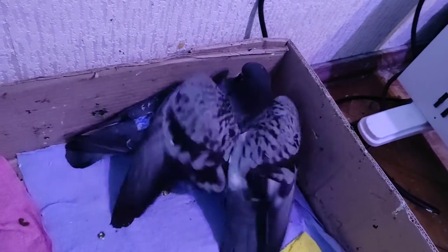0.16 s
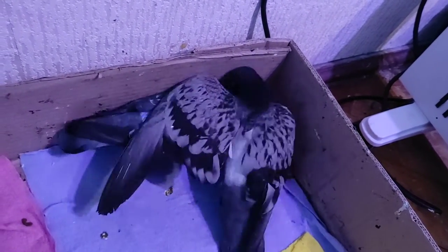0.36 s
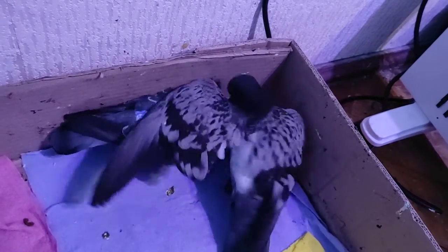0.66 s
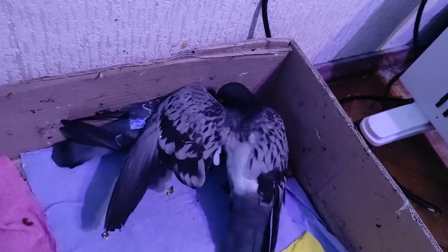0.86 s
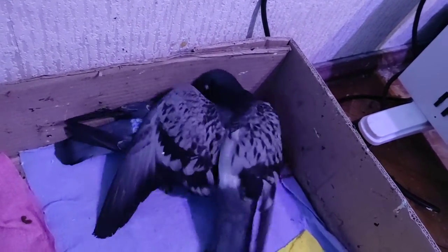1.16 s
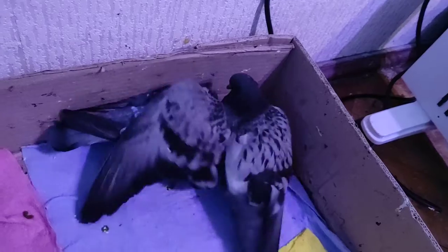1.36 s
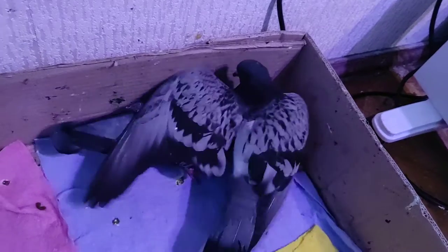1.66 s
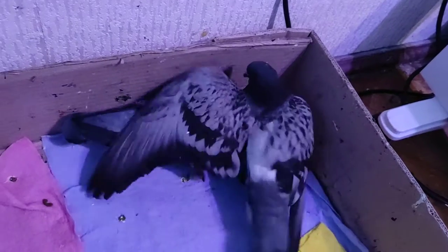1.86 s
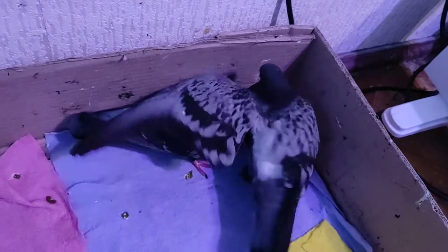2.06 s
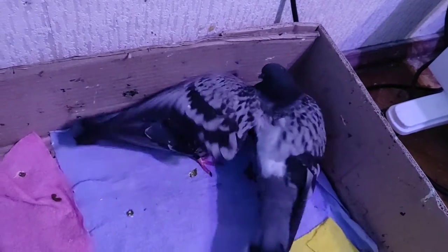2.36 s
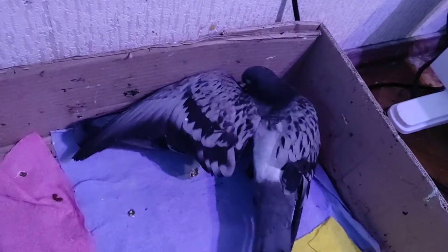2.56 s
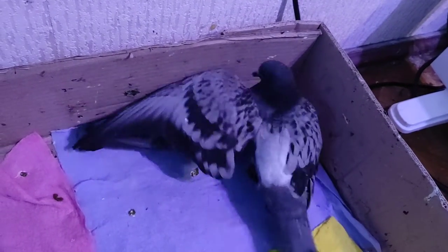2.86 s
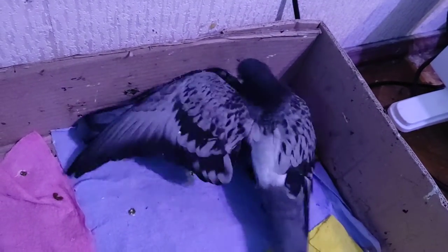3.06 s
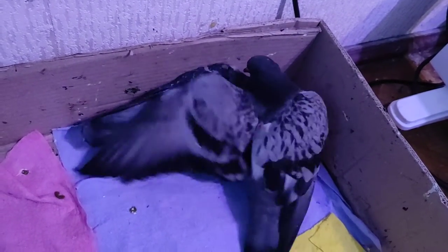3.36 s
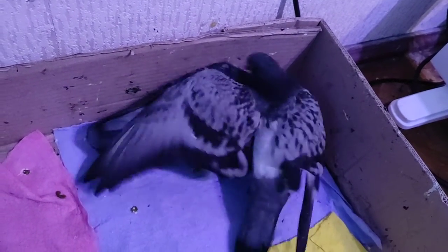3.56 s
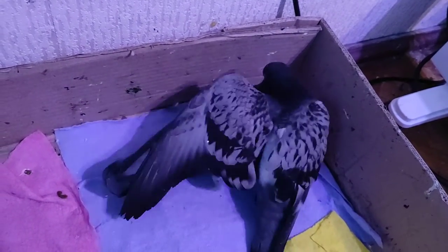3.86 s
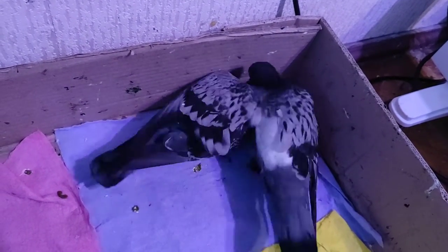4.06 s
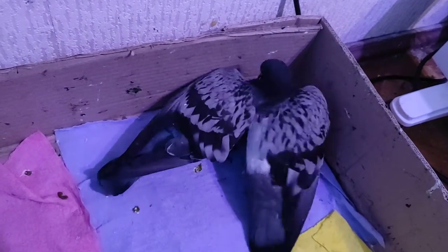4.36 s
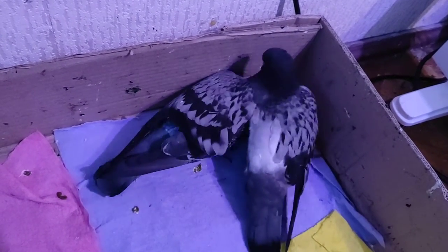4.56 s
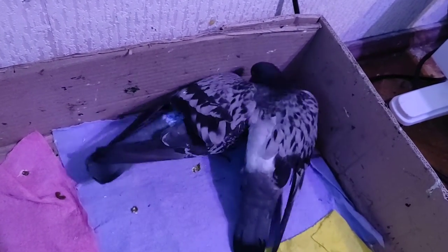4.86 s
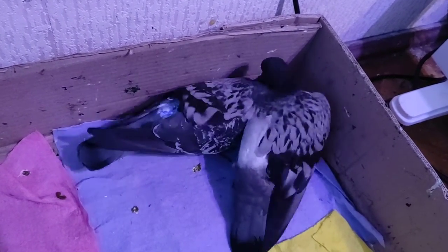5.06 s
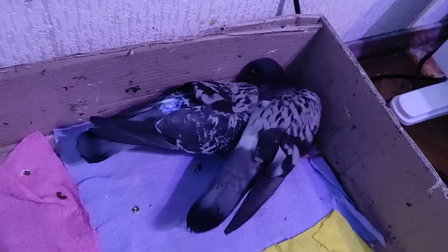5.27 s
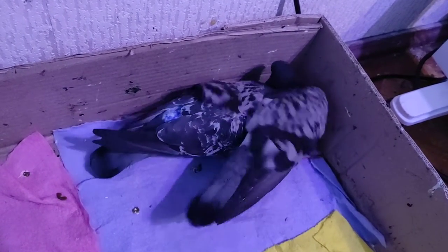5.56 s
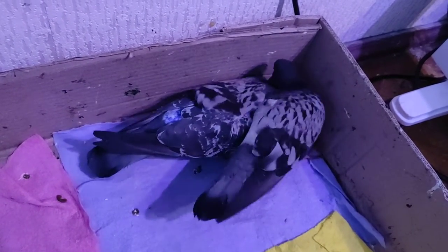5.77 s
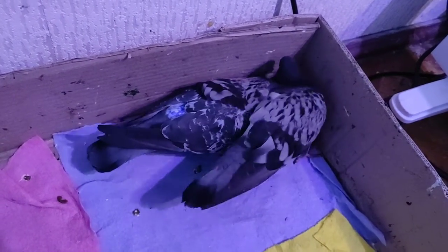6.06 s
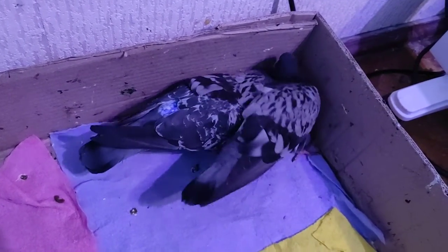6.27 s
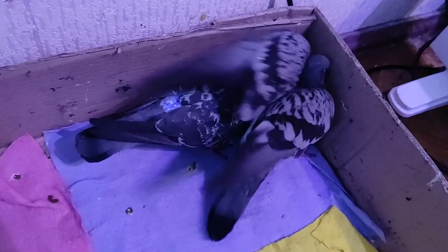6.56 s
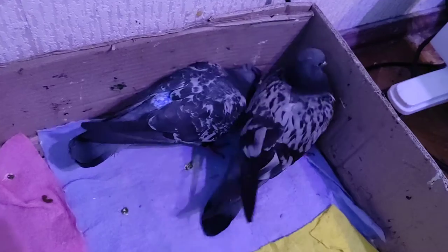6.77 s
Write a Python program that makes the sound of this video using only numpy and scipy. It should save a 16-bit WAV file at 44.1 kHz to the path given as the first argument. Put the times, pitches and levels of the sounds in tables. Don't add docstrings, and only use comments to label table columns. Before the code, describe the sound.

Two pigeons scuffle in a cardboard box, feathers rustling, wings slapping and knocking the walls, with faint low grunts and handling bumps.

```python
import sys
import numpy as np
from scipy import signal
from scipy.fft import rfft, irfft
from scipy.io import wavfile

SR = 44100
rng = np.random.default_rng(int(sys.argv[2]) if len(sys.argv) > 2 else 0)


def gain_from_decibels(decibels):
    exponent = np.asarray(decibels, float) / 20
    return 10 ** exponent


def inscribe(sig):
    pcm = np.round(np.clip(np.atleast_2d(sig).T, -1, 1) * 32767)
    wavfile.write(sys.argv[1], SR, pcm.astype(np.int16))


N = 304731

# (frequency [Hz], density [dB])
AIR_SPECTRUM = [(20, 13.5), (60, -5), (125, -21.5), (170, -7.5), (300, -19), (600, -19), (1500, -31),
                (4000, -29.5), (9000, -37.5), (16000, -37)]
AIR_DB, ROOM_T60_S, ROOM_DB = -59, 0.42, -14

PORT_HZ, PORT_Q, LEFT_LAG_S = 7400, 9, 0.0001
# (time [s], treble [dB])
FINGER_COVER = [
    (0, 5),
    (3.9, -2),
    (5.2, -11),
    (6.91, -19),
]
# (time [s], level [dB])
GRIP = [(0, -54), (.8, -49.5), (1.0, -56), (1.5, -49), (2.0, -51), (2.2, -42), (2.4, -57.5), (2.6, -44),
        (2.8, -51), (3.0, -49), (3.8, -52), (4.2, -43.5), (5.0, -50), (5.5, -50), (5.9, -34.5),
        (6.2, -42.5), (6.4, -36.5), (6.9, -33)]
# (time [s], peak [dB], snap re peak [dB], deep shove re peak [dB])
BUMPS = [(1.288, -45, -7, 11.5), (2.085, -39, -15, -14), (2.158, -23.5, 1, 11.5), (2.585, -20.5, -9.5, -18),
         (2.691, -34.5, -8, 6.5), (3.577, -29, -3, 13), (3.613, -29, -29, -12), (4.167, -35, -44, 11.5),
         (4.301, -34.5, -7, 5.5), (4.627, -34, -25, 20.5), (4.684, -36, -15, -5), (5.304, -35, -31, 11.5),
         (5.608, -52, -4, 30), (5.673, -39, -19, -9), (5.789, -14, -3, 7.5), (5.842, -15.5, -3.5, 11),
         (5.877, -14, -6, 0), (5.92, -32, -7, 23.5), (5.956, -17, -10, 4), (6.05, -37, -17, 21),
         (6.091, -36.5, -28, 11), (6.159, -40, -12, -9), (6.53, -31, -29, 16.5), (6.599, -43, -26, 1),
         (6.66, -38, -15, -7), (6.701, -33, -28, -13), (6.733, -42, -6, 2), (6.78, -25.5, -13, -4),
         (6.833, -23.5, -39, -10), (6.902, -19, 0, 23)]
# (time [s], casing ring [Hz], ring decay [s], nail tick [dB])
RAPS = [
    (5.789, 71, 0.022, -27),
    (5.842, 123.6, 0.019, -21),
    (5.876, 130, 0.012, -24.5),
    (5.956, 138.5, 0.017, -21),
    (6.902, 121, 0.013, -31),
]
# (middle [s], peak [dB], pitch [Hz], half-length [s])
CLACKS = [(5.792, -9, 293, .0032), (5.7905, -20, 520, .0015), (5.8015, -14.5, 144, .005),
          (5.845, -24, 400, 0.0021), (5.878, -29, 570, .0022), (5.9595, -20, 120, .003),
          (5.97, -21, 29, 0.013), (5.855, -26, 30, .01), (5.607, -31, 85, .012), (5.75, -37, 100, 0.017),
          (6.903, -20, 357, .003)]
SHUFFLE_DB, SHUFFLE_FOLLOWS = -50.5, 0.41

# (start [s], length [s], pulse rate [Hz], hum [dB], throat ring re hum [dB])
GRUNTS = [(1.505, .13, 110.6, -59, -6), (1.63, 0.12, 108, -59, -6), (2.041, 0.14, 104.1, -60, -6.5),
          (2.194, 0.11, 106.8, -60.5, -5), (2.654, 0.12, 100.8, -65, -4.5), (2.778, 0.17, 101.1, -66, -4),
          (3.621, 0.09, 101.2, -59, -8), (3.707, 0.081, 105, -55.5, -12), (5.729, 0.072, 107.6, -62, -1.5),
          (5.981, .07, 103.2, -61, -6.5), (6.36, 0.13, 92.6, -64.5, 0.5), (6.486, 0.083, 105.2, -58, -10.5),
          (6.597, 0.077, 97.8, -61, -5), (6.692, .11, 78.2, -61, -7)]
PITCH_SAGS = [94, 42, 77, 83, 83.5, 90, 83, 89, 90, 83, -60, 60, 85, -51]
# (frequency [Hz], width [Hz], level [dB])
THROAT = [(261, 79, 10), (531, 17, -5)]
# (multiple of the pulse rate [1], level [dB])
OVERTONES = [(3, -1), (4, -6), (5, -20)]
SWELL_DB_PER_S, GRUNT_RELEASE_S, LAST_DROP_HZ, LAST_DROP_S = 25, 0.016, 5.4, 0.025

# (middle [s], peak [dB], pitch [Hz], half-length [s])
THUDS = [(.1215, -23.5, 555, 0.0027), (.127, -34, 690, 0.0028), (.1365, -24.5, 173, 0.007),
         (.327, -38, 573, 0.0029), (1.1375, -22, 1040, 0.0018), (1.141, -18.5, 723, 0.0027),
         (1.155, -37, 755, 0.0034), (1.316, -45, 705, 0.0035), (1.477, -43, 736, 0.0029),
         (1.715, -46, 195, .018), (.33, -38, 280, .008), (.175, -38, 220, .01), (1.163, -36, 290, .008),
         (2.152, -41, 706, .004), (2.458, -35.5, 690, 0.0018), (2.4645, -33, 716, 0.0017),
         (2.465, -41, 229, 0.0088), (2.923, -38.5, 550, 0.0045), (3.29, -37, 550, 0.0034),
         (4.838, -37.5, 254, 0.0048), (5.985, -39, 1060, 0.0029), (5.985, -46, 1680, .003),
         (6.181, -33.5, 1580, 0.0023), (6.19, -39, 227, 0.0048)]
# (start [s], length [s], level [dB], low edge [Hz], high edge [Hz])
SCRAPES = [(.128, 0.0075, -39.5, 1200, 2700), (0.69, 0.03, -54, 2200, 5200), (.803, 0.036, -48, 2540, 3500),
           (1.551, .004, -43, 2100, 2700), (1.551, .004, -50, 5500, 9000), (3.469, .003, -50, 1000, 9000),
           (3.75, .003, -52, 3000, 9000), (4.315, .004, -58, 3000, 9000), (1.4, .015, -51.5, 860, 1200),
           (1.775, .015, -47, 1700, 1850), (3.96, 0.038, -60, 130, 310), (0.455, 0.065, -64.5, 242, 340),
           (.79, 0.056, -59.5, 230, 340)]
# (time [s], crack peak [dB], panel [dB], wall [dB], edge [dB])
KNOCKS = [(0.119, -9, -27.5, -32, -37), (0.3246, -21.5, -34.5, -37, -49), (0.676, -37, -58, -55.5, -37.5),
          (1.136, -5, -29.5, -24, -21.5), (1.2887, -28, -69, -78, -37), (1.3078, -28, -39.5, -47, -67),
          (1.405, -53, -52, -60, -47), (1.4719, -40, -40, -42.5, -64), (1.5517, -27, -50, -48, -52),
          (1.7747, -29.5, -40, -72, -35), (1.9978, -26, -52, -50.5, -72), (2.1459, -22, -65, -39.5, -56),
          (2.3112, -19, -47.5, -51, -63), (2.4535, -15, -39, -38.5, -61),
          (2.9182, -12, -35.5, -35.5, -30.5), (3.282, -48, -45, -43.5, -37), (3.472, -36, -53, -50.5, -44),
          (3.673, -38, -45, -53, -66), (3.7143, -52, -42, -51.5, -42.5), (3.752, -31, -61, -67, -47),
          (4.832, -35.5, -39.5, -64, -60), (5.9807, -22, -50, -49, -53), (6.1775, -26, -36.5, -48, -37.5),
          (6.4481, -22, -61, -64, -44)]
# (frequency [Hz], level [dB], t60 [s])
PANEL_MODES = [(105, 1, 0.045), (144.8, -7.5, 0.24), (202, -3, 0.091), (214, -2, 0.069), (268, 2, 0.056),
               (307, 4.5, 0.037), (423, -9, 0.025), (460, -5, 0.025)]
# (frequency [Hz], level [dB], t60 [s])
WALL_MODES = [(552, 6.5, 0.031), (616, 1, 0.042), (706, 1, 0.046), (794, 2.5, 0.042), (850, -6, 0.019),
              (1008, -8, 0.12), (1030, -13.5, 0.086), (1120, -9.5, 0.052)]
# (frequency [Hz], level [dB], t60 [s])
EDGE_MODES = [(1410, 0, .014), (1600, 0, .014), (1850, -2, .012), (2150, -3, .01), (2600, -3, .01),
              (3200, -3, .008)]
PANEL_LATE_S, CRACK_T60_S = 0.00381, 0.043

# (time [s], hiss [dB])
FIDGET = [(0, -48), (.3, -52.5), (.9, -58), (1.4, -49), (1.8, -51), (1.85, -92), (1.92, -56.5), (1.98, -50),
          (2.4, -49), (2.8, -55.5), (3.0, -60), (3.3, -74), (3.6, -52), (4.3, -64), (5.7, -58),
          (6.3, -67.5), (6.6, -56), (6.9, -75)]
# (peak [s], hiss [dB], fall [s], rub re hiss [dB])
SLAPS = [(0.124, -39, 0.022, 8.5), (0.326, -40, 0.022, 2), (0.686, -45.5, 0.096, -10.5),
         (1.314, -39, 0.029, -7.5), (1.47, -37, 0.023, -7.5), (1.786, -38.5, 0.04, -12),
         (2.006, -33, .016, -22), (2.155, -32, 0.031, -13), (2.313, -41, 0.083, -9),
         (2.461, -33, 0.022, -16), (3.286, -36.5, 0.047, -12), (3.473, -38, 0.039, -17),
         (3.678, -45.5, 0.014, -7), (4.834, -52, 0.034, -7.5), (5.797, -45.5, 0.038, -6.5),
         (5.885, -55.5, 0.035, -6), (5.945, -47, 0.028, -9), (5.984, -49.5, 0.024, 7),
         (6.18, -52, 0.013, 9.5), (6.456, -46, 0.0066, 0)]
# (peak [s], hiss [dB], fall [s])
FLICKS = [(0.253, -49, 0.015), (0.434, -47, .005), (0.964, -45, 0.027), (1.213, -38.5, 0.018),
          (1.382, -44.5, 0.25), (1.62, -43.5, .025), (1.712, -44.5, 0.05), (2.09, -47, 0.047),
          (2.255, -56, .029), (2.518, -44, 0.028), (2.841, -48, .011), (3.653, -49, 0.023),
          (4.186, -51, .009), (4.318, -47, 0.26), (4.5, -44.5, 0.05), (4.905, -47, 0.028),
          (5.115, -46.5, 0.014), (5.681, -48.5, 0.0065), (5.747, -61, .011), (6.087, -45, 0.022)]
# (peak [s], hiss [dB], rise [s], fall [s])
SWEEPS = [(0.295, -48.5, 0.023, .009), (0.509, -49, 0.041, 0.028), (0.609, -39.5, 0.038, 0.085),
          (0.812, -39, 0.015, 0.035), (0.838, -39.5, 0.03, 0.03), (0.875, -44.5, 0.027, 0.034),
          (1.14, -43, 0.095, 0.063), (1.54, -46, 0.03, 0.01), (2.585, -49, 0.033, 0.0097),
          (2.641, -45, 0.079, 0.011), (2.921, -44, 0.07, 0.13), (3.096, -43.5, 0.079, 0.05),
          (3.234, -49, 0.076, 0.053), (3.372, -48.5, 0.078, 0.1), (3.758, -47, 0.054, 0.046),
          (3.845, -44, 0.03, 0.034), (3.983, -45, 0.055, 0.013), (4.074, -52, 0.028, 0.067),
          (4.156, -48.5, 0.026, 0.04), (4.44, -49, .087, 0.02), (4.611, -46.5, 0.025, .048),
          (4.715, -53.5, 0.038, 0.12), (4.982, -45, 0.045, 0.12), (5.284, -51.5, 0.062, 0.046),
          (5.492, -46.5, 0.025, 0.021), (5.576, -51.5, 0.02, .068), (5.652, -46, 0.011, 0.025),
          (6.28, -57, .025, 0.021), (6.371, -53, 0.02, 0.053), (6.61, -32, 0.063, 0.035),
          (6.721, -48, 0.045, .023), (6.802, -52.5, 0.022, 0.046)]
# (low edge [Hz], high edge [Hz], level [dB])
BARB_BANDS = [(2430, 4370, -2), (4860, 7600, -1), (5840, 14100, -1.5), (8620, 9100, 0),
              (11560, 15300, -6.5), (13600, 17700, 14)]
# (frequency [Hz], density [dB])
RUB_SPECTRUM = [(300, -4), (700, -0.5), (1100, -2), (2000, -4.5), (3500, -11.5), (5000, -9.5)]
SLAP_RISE_S, FLICK_RISE_S = 0.01, 0.012
FLICK_RUB_DB, SWEEP_RUB_DB, FIDGET_RUB_DB = -13, -14.5, -8
BLOTCH_DB = 2.2


def rms_one(x):
    return x / np.sqrt(np.mean(x ** 2) + 1e-20)


def in_time(rows):
    s, *columns = np.transpose(rows)
    return [np.interp(np.arange(N) / SR, s, c) for c in columns]


def band(x, low_hz, high_hz, order=2):
    edges = [low_hz, min(high_hz, 0.45 * SR)]
    return signal.sosfilt(signal.butter(order, edges, "band", fs=SR, output="sos"), x)


def soften(x, hz, order=1):
    return signal.lfilter(*signal.butter(order, hz, fs=SR), x)


def drift(rate_hz):
    r = np.exp(-2 * np.pi * rate_hz / SR)
    slow = signal.lfilter([1], [1, -2 * r, r * r], rng.standard_normal(N + 9000))
    return rms_one(slow[9000:])


def coloured(points, channels):
    hz = np.maximum(np.fft.rfftfreq(N, 1 / SR), 1)
    point_hz, point_db = np.array(points).T
    gain = gain_from_decibels(np.interp(np.log(hz), np.log(point_hz), point_db, -60, -60))
    return rms_one(irfft(rfft(rng.standard_normal((channels, N))) * gain, N))


def ring(clicks, hz, t60):
    r, w = gain_from_decibels(-60 / (t60 * SR)), 2 * np.pi * hz / SR
    return signal.lfilter([0, np.sin(w)], [1, -2 * r * np.cos(w), r * r], clicks + 1e-18)


def bursts(rows):
    out, t = np.zeros(N), np.arange(N) / SR
    for s, level_db, hz, half in rows:
        n = slice(int((s - 0.05) * SR), int((s + 0.05) * SR))
        since = t[n] - s
        out[n] += gain_from_decibels(level_db) * np.cos(2 * np.pi * hz * since) * np.exp(-(since / half) ** 2)
    return out


def cavity(x, hz, q):
    w = 2 * SR * np.tan(np.pi * hz / SR)
    return signal.lfilter(*signal.bilinear([1], [1 / w ** 2, 1 / (w * q), 1], SR), x)


def room(x, first_s):
    t = np.arange(SR // 2) / SR
    white = rng.standard_normal((2, len(t))) * (t > first_s)
    low = soften(white, 1000, order=2)
    tail = low * gain_from_decibels(-60 * t / (0.62 * ROOM_T60_S))
    tail += gain_from_decibels(-6.0) * (white - low) * gain_from_decibels(-60 * t / (0.25 * ROOM_T60_S))
    return gain_from_decibels(-20.0) * signal.fftconvolve(x[None], tail, axes=1)[:, :N]


def grip_rumble():
    deep_db, = in_time(GRIP)
    fidget_db, = in_time(FIDGET)
    cover_db, = in_time(FINGER_COVER)
    shuffle_db = SHUFFLE_DB + SHUFFLE_FOLLOWS * (fidget_db + 55) + 0.1 * cover_db
    deep = rms_one(band(rng.standard_normal(N), 8.7, 53.2))
    shuffle = rms_one(band(rng.standard_normal(N), 147, 220, order=1))
    out = gain_from_decibels(deep_db + 3.17 * drift(12.0)) * deep
    return out + gain_from_decibels(shuffle_db - 10.5 + 2.4 * drift(42)) * shuffle


def finger_bumps():
    out, t = np.zeros(N), np.arange(3000) / SR
    for (s, level_db, snap_db, shove_db), luck in zip(BUMPS, rng.random((len(BUMPS), 3))):
        hz, decay, tick_db = 105 * (0.723 + 0.65 * luck[0]), 0.015, snap_db / 4 - 28.0
        hard = [rap[1:] for rap in RAPS if abs(rap[0] - s) < 0.01]
        if hard:
            hz, decay, tick_db = hard[0]
        falling = hz * t + 1.456 * (1 - np.exp(-t / 0.0064))
        body = np.sin(2 * np.pi * (falling + 0.32 + 0.13 * luck[1]))
        body *= np.exp(-t / decay) * (1 - np.exp(-(t / 0.0056) ** 2))
        snap = np.sin(2 * np.pi * (280 * t + 0.5 * (1 - np.exp(-t / 0.0088))))
        snap *= gain_from_decibels(snap_db - 0.5) * np.exp(-((t - 0.0045) / 0.0012) ** 2)
        shove = gain_from_decibels(shove_db - 7.0) * np.sin(2 * np.pi * 58 * t * (0.54 + 1.22 * luck[2]))
        shove *= np.sin(np.pi * t / t[-1]) * np.exp(-t / 0.018)
        tick = gain_from_decibels(tick_db) * np.sin(2 * np.pi * 950 * t) * np.exp(-((t - 0.002) / 0.0012) ** 2)
        at = int((s - 0.0015) * SR)
        out[at:at + len(t)] += (gain_from_decibels(level_db) * (body + snap + tick + shove))[:N - at]
    return out + bursts(CLACKS)


def grunts(wobble=0.0363, throb_db=4.5, jitter=0.086):
    out, pulses, t = np.zeros(N), np.zeros(N), np.arange(N) / SR
    unsteady, shake = drift(26.1), drift(61)
    throbs = gain_from_decibels(throb_db * np.array([drift(28) for _ in range(4)]))
    for (s, length, hz, hum_db, ring_db), sag in zip(GRUNTS, PITCH_SAGS):
        since = np.clip(t - s, 0, length)
        rate = hz - sag * since - LAST_DROP_HZ * np.exp((since - length) / LAST_DROP_S)
        gate = np.clip(np.minimum(since / 0.013, (length - since) / GRUNT_RELEASE_S), 0, 1)
        gate = gate * gain_from_decibels(hum_db + SWELL_DB_PER_S * since)
        cycles = np.cumsum(rate * (1 + wobble * unsteady)) / SR
        out += gate * gain_from_decibels(7.0) * throbs[0] * np.sin(4 * np.pi * cycles)
        for (multiple, db), throb in zip(OVERTONES, throbs[1:]):
            out += gate * gain_from_decibels(ring_db + db + 4.5) * throb * np.sin(2 * np.pi * multiple * cycles)
        fires = np.diff(np.floor(cycles + jitter * shake)) > 0
        pulses[1:] += (gate * gain_from_decibels(ring_db + throb_db * shake))[1:] * fires
    return out + sum(gain_from_decibels(db) * ring(pulses, hz, 2.26 / width) for hz, width, db in THROAT)


def scrapes():
    out, t, white = np.zeros(N), np.arange(N) / SR, rng.standard_normal(N)
    for s, length, level_db, low_hz, high_hz in SCRAPES:
        n = slice(int((s - 0.05) * SR), int((s + length + 0.05) * SR))
        attack = (t[n] - s) / 0.002
        release = (s + length - t[n]) / (0.44 * length) + 1
        gate = np.clip(np.minimum(attack, release), 0, 1)
        out[n] += gain_from_decibels(level_db) * gate * rms_one(band(white[n], low_hz, high_hz))
    return out


def thuds():
    return bursts(THUDS)


def knocks():
    table, out = np.array(KNOCKS), np.zeros(N)
    when = np.sort(rng.random((len(table), 5)) * [0, 1, 1, 1, 1])
    # (column of KNOCKS, modes, trim [dB], contact [s], delay [s])
    parts = [(2, PANEL_MODES, -6.0, 0.018, PANEL_LATE_S),
             (3, WALL_MODES, -5.0, 0.007, 0),
             (4, EDGE_MODES, -6.0, 0.005, 0)]
    for column, modes, trim_db, contact_s, late_s in parts:
        touch = ((table[:, :1] + late_s + contact_s * when) * SR).astype(int)
        for hz, level_db, t60 in modes:
            luck = rng.normal(0, 1, (len(table), 5))
            force = (0.25 * luck + 0.7 * np.sign(luck)) * [0.54, 0.72, 0.78, 0.38, 0.33]
            clicks = np.zeros(N)
            clicks[touch] = gain_from_decibels(table[:, column, None] + level_db + trim_db) * force
            out += ring(clicks, hz, t60)
    starts = np.zeros(N)
    starts[(table[:, 0] * SR).astype(int)] = gain_from_decibels(table[:, 1] - 17.0)
    crack = signal.lfilter([1], [1, -gain_from_decibels(-60 / (CRACK_T60_S * SR))], starts)
    return out + band(crack * rng.standard_normal(N), 2550, 14400, order=1)


def wing_strokes():
    strokes = [(s, db, SLAP_RISE_S * gain_from_decibels(-0.5 * max(rub + 6, 0)), fall, rub) for s, db, fall, rub in SLAPS]
    strokes += [(s, db, FLICK_RISE_S, fall, FLICK_RUB_DB) for s, db, fall in FLICKS]
    strokes += [(*row, SWEEP_RUB_DB) for row in SWEEPS]
    fidget_db, = in_time(FIDGET)
    hiss = gain_from_decibels(2 * fidget_db - 1.2)
    rub = gain_from_decibels(2 * (fidget_db + FIDGET_RUB_DB) - 15.0)
    for s, level_db, rise, fall, rub_db in strokes:
        n = np.arange(max(int((s - 0.15) * SR), 0), min(int((s + 0.17) * SR), N))
        t = n / SR
        away = np.where(t < s, (s - t) / max(rise, 0.002), (t - s) / max(fall, 0.002))
        power = gain_from_decibels(2 * (level_db - 11.0 * away ** 1.235))
        hiss[n] += power
        rub[n] += power * gain_from_decibels(2 * (rub_db - 2.0))
    return hiss, rub


def feathers(grain_db=1.0, patchy_db=-2.0, slips_per_s=60, alike=0.12):
    hiss, rub = wing_strokes()
    slips = (rng.random(N) < slips_per_s / SR) * np.minimum(rng.exponential(1, N), 2.5)
    grain = gain_from_decibels(grain_db * drift(35)) + signal.lfilter([0.6], [1, -0.985], slips)
    barbs = np.zeros((2, N))
    for low_hz, high_hz, db in BARB_BANDS:
        blotches = gain_from_decibels(db + patchy_db * drift(50) + BLOTCH_DB * drift(18.8))
        barbs += blotches * band(rng.standard_normal((2, N)), low_hz, high_hz)
    barbs *= grain
    barbs /= np.std(band(cavity(barbs[1], PORT_HZ, PORT_Q), 3900, 11000))
    dull = rms_one(coloured(RUB_SPECTRUM, channels=2) * grain * gain_from_decibels(patchy_db * drift(20.3)))
    both = np.sqrt(hiss) * barbs + np.sqrt(rub) * dull
    return np.array([alike * both[1] + np.sqrt(1 - alike ** 2) * both[0], both[1]])


def covered_port(x):
    cover_db, = in_time(FINGER_COVER)
    late = np.interp(np.arange(N) - LEFT_LAG_S * SR, np.arange(N), x)
    bass = soften(late, 330)
    dull = signal.sosfilt(signal.butter(2, 4500, fs=SR, output="sos"), soften(late, 3200))
    closed = soften(dull, 600)
    dull = closed + np.minimum(gain_from_decibels(cover_db - 4.5), 1) * (dull - closed)
    leak = gain_from_decibels(-19.0) * band(late, 1650, 5800) + gain_from_decibels(-17.5) * band(late, 11300, 14600)
    return gain_from_decibels(-0.5) * dull + gain_from_decibels(-3.5) * bass + gain_from_decibels(cover_db) * leak


def scene():
    near = knocks() + grunts()
    dents = thuds() + scrapes()
    first_s = rng.uniform(0.0075, 0.0293, (2, 6)).min(axis=1, keepdims=True)
    air = near + dents + feathers() + gain_from_decibels(AIR_DB) * coloured(AIR_SPECTRUM, channels=2)
    air = air + gain_from_decibels(ROOM_DB) * room(near + dents, first_s)
    capsule_hiss = gain_from_decibels(-105) * band(rng.standard_normal(N), 1500, 15000, order=1)
    left = covered_port(air[0]) + grip_rumble() + finger_bumps() + capsule_hiss
    return np.array([left, cavity(air[1], PORT_HZ, PORT_Q)])


def low_pass(x):
    return signal.sosfilt(signal.butter(12, 16820, fs=SR, output="sos"), x)


def record(dry):
    mix = signal.sosfilt(signal.cheby2(10, 40, 16500, fs=SR, output="sos"), dry)
    return low_pass(mix)


dry = scene()
out = record(dry)
inscribe(out)
```